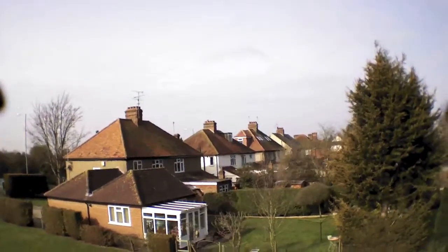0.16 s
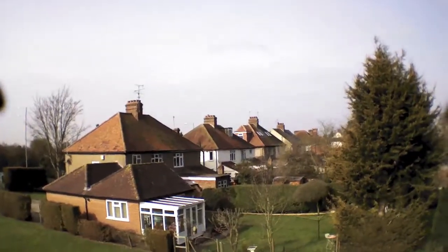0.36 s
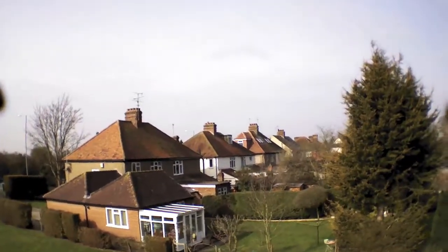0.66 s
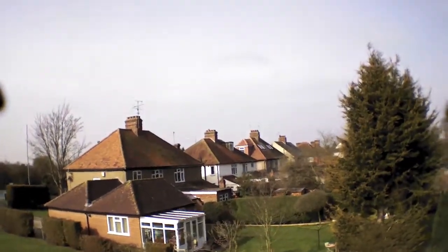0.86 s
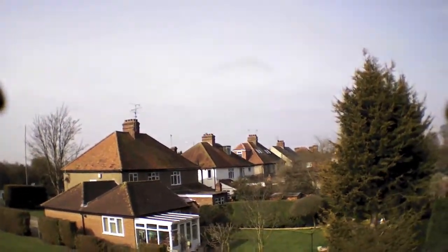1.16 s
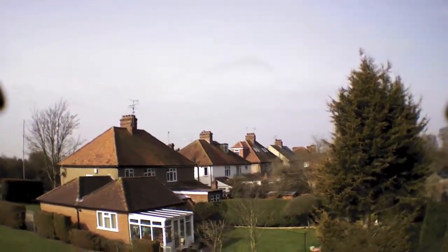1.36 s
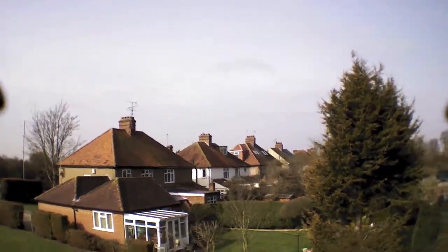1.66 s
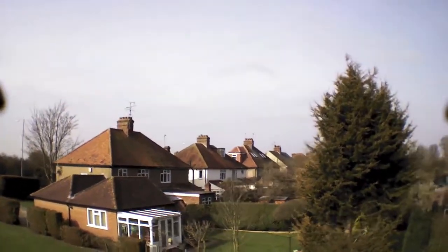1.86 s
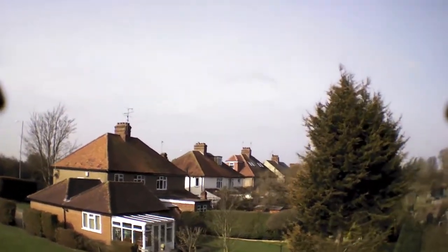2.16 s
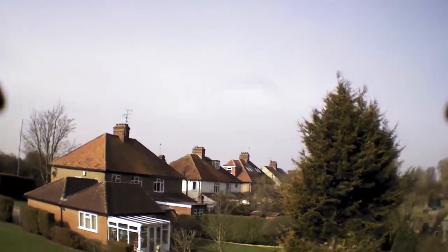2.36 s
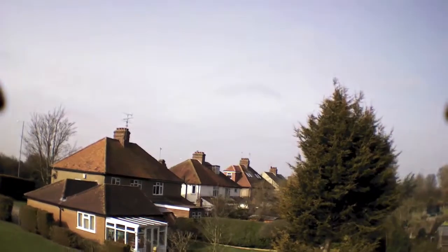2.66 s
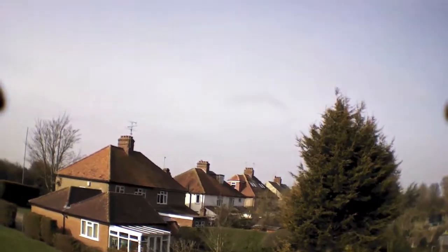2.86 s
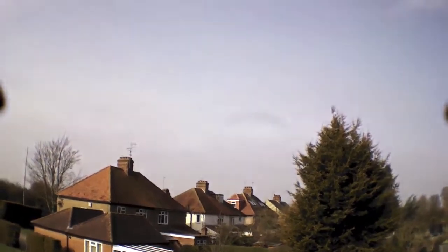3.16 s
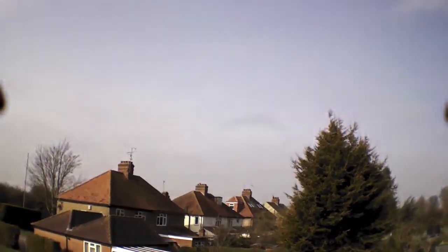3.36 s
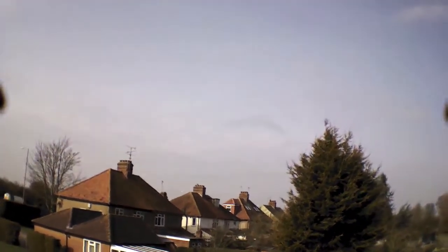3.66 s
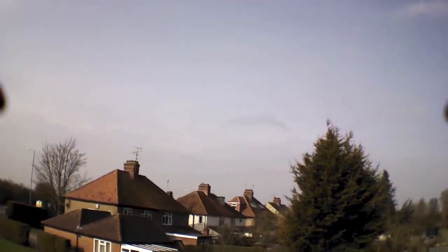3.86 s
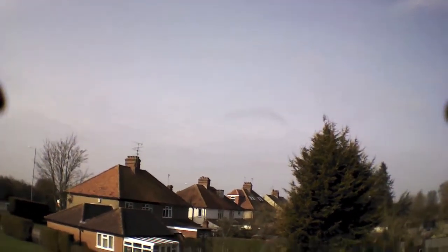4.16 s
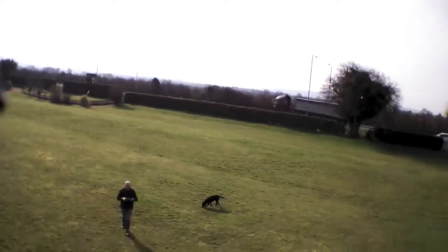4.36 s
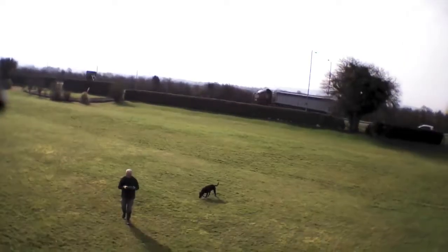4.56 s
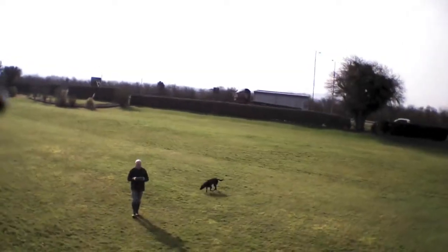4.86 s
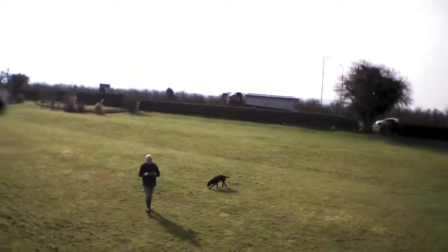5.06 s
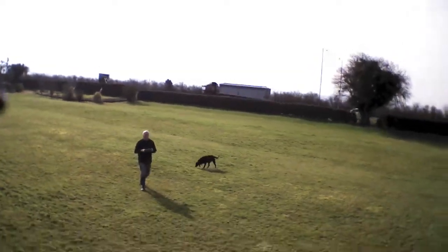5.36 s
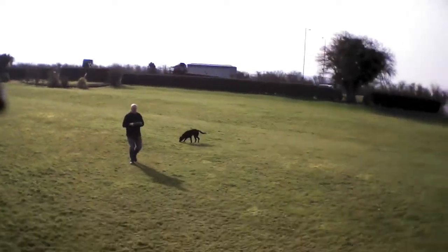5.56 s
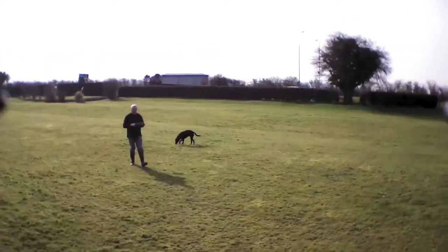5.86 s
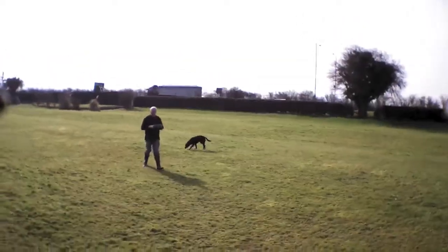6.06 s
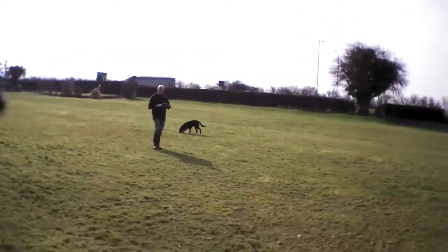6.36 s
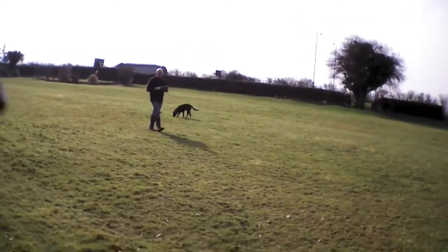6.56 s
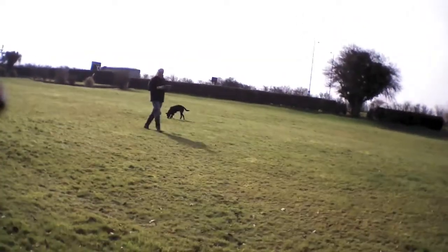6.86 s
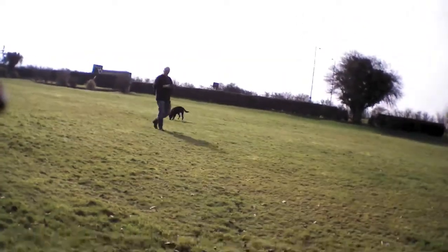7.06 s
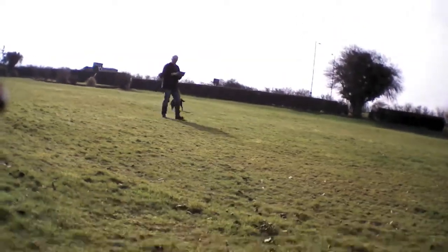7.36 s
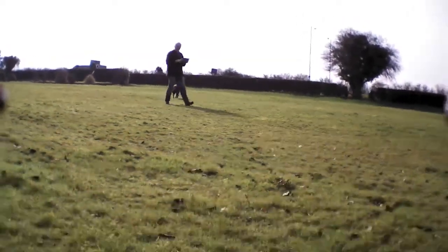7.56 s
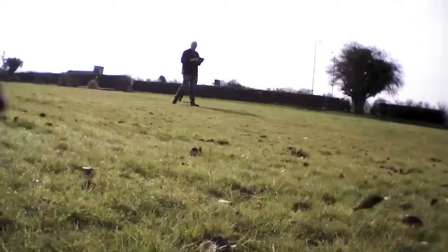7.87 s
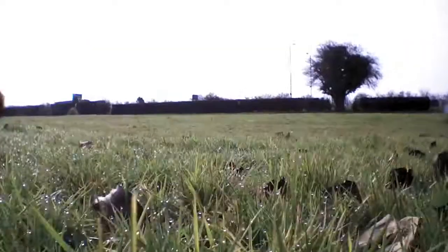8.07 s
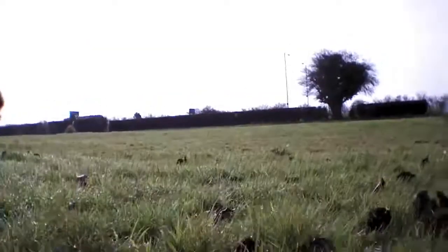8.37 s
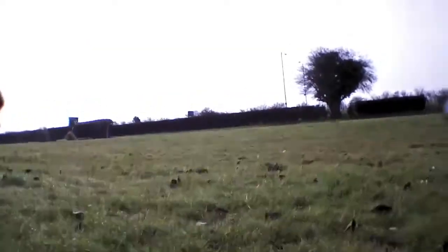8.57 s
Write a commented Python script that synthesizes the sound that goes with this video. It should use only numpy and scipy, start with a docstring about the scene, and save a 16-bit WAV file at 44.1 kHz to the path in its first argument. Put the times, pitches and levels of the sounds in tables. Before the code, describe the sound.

A small drone flies outdoors with a thin, wavering whine and a steady propeller hiss, over low wind and distant traffic. At first, cloth or grass swishes, plastic clicks near the microphone and a bird whistles high. After a brief dip, the hiss and wind are stronger and birds chirp. More swishes follow, then another dip, and the motors spool up close by as gusts buffet the microphone.

```python
"""Quadcopter over a grassy field

In three passages joined by short fades, a small quadcopter whines and hisses overhead and at last spools
up close by. Its motors give wavering tones, its rotors a hiss modulated by the passing blades. Wind, far
traffic and birds lie behind, while grass and cloth swish and plastic clicks near the microphone."""
import sys
import numpy as np
from scipy import signal
from scipy.io import wavfile
from scipy.ndimage import uniform_filter1d

SR = 44100
rng = np.random.default_rng(int(sys.argv[2]) if len(sys.argv) > 2 else 0)


def store_pcm(level_fs):
    """Save levels as 16-bit WAV."""
    pcm = np.round(np.clip(level_fs, -1, 1) * 32767).astype(np.int16)
    wavfile.write(sys.argv[1], SR, np.atleast_2d(pcm).T)


N = 384993
T = np.arange(N) / SR

# dips between the passages: (time [s], fade-out [s], fade-in [s])
FADES = [(4.261, 0.1, 0.095), (8.096, 0.086, 0.11)]
# slow levels, one list a passage: (time [s], wind [dB], traffic [dB], rotor hiss [dB], breeze [dB])
BED_LEVELS = [
    [(0, -54, -45.5, -42.5, -60), (.4, -50.5, -44.5, -44, -58), (.8, -48, -44.5, -40.5, -60),
     (1.1, -51.5, -45.5, -45, -47), (2.55, -56, -43.5, -42.5, -50), (2.8, -60, -46.5, -45.5, -51.5),
     (3.5, -58, -42.5, -45.5, -47), (4.12, -56, -40.5, -42, -49.5)],
    [(4.4, -38.5, -39, -36.5, -47), (5.46, -39, -40, -37.5, -49.5), (6.45, -38, -40.5, -37.5, -46.5),
     (6.85, -38, -39, -41.5, -46.5), (7.25, -38.5, -37, -44, -53), (7.55, -40, -38, -47.5, -49),
     (7.95, -40.5, -38.5, -52, -46.5)],
    [(8.2, -41, -38, -31.5, -46), (8.45, -36.5, -34.5, -28.5, -42.5), (8.73, -41.5, -31, -23.5, -37)],
]


def gain_of(db):
    """Amplitude ratio of a level in decibels."""
    return 10 ** (np.asarray(db) / 20)


def unit_rms(x):
    """Normalisation to rms 1."""
    return x / np.sqrt(np.mean(x ** 2) + 1e-20)


def superpose(events):
    """Linear superposition of (start [s], sound) pairs."""
    mix = np.zeros(N)
    for start, sound in events:
        part = mix[round(start * SR):][:len(sound)]
        part += sound[:len(part)]
    return mix


def unroll(rows):
    """Linear interpolation of breakpoints: the start time and each column, sample by sample."""
    times, *columns = np.transpose(rows)
    t = np.arange(times[0], times[-1], 1 / SR)
    return times[0], [np.interp(t, times, c) for c in columns]


def bed_levels(t):
    """Wind, traffic, hiss and breeze levels [dB], interpolated within each passage."""
    passage = np.searchsorted([fade[0] for fade in FADES], t)
    curves = [[np.interp(t, times, c) for c in columns] for times, *columns in map(np.transpose, BED_LEVELS)]
    return np.choose(passage, np.array(curves))


def drift(n, span_s):
    """Low-pass random fluctuation of rms 1, correlated over about span_s."""
    size = max(int(span_s * SR), 2)
    return unit_rms(uniform_filter1d(uniform_filter1d(rng.standard_normal(n), size), size))


def noise(spectrum, patchy_db, size=1024, n=N):
    """Spectrally shaped noise of rms 1 whose level varies in patches over time and frequency."""
    frames, hz = n * 4 // size + 5, np.fft.rfftfreq(size, 1 / SR)
    real, imag, patches = rng.standard_normal((frames, len(hz), 3)).T
    patches = uniform_filter1d(patches, size=size // 64, axis=0)
    patches = unit_rms(uniform_filter1d(patches, size=12, axis=1))
    knots_hz, db = np.transpose(spectrum)
    colour = np.interp(np.log(hz + 1), np.log(knots_hz + 1), db, -90, -90)
    bins = (real + 1j * imag) * gain_of(colour[:, None] + patchy_db * patches)
    return unit_rms(signal.istft(bins, nperseg=size, noverlap=size * 3 // 4)[1][:n])


def passage_noise(spectra, patchy_db, size=1024):
    """Piecewise shaped noise, with one spectrum for each passage."""
    lengths = np.diff([0] + [round(fade[0] * SR) for fade in FADES] + [N])
    return np.concatenate([noise(spectrum, patchy_db, size, n) for spectrum, n in zip(spectra, lengths)])


def narrowband(hz, width_hz):
    """Noise of rms 1 through two cascaded resonators that follow the curve hz."""
    carrier = np.exp(2j * np.pi * np.cumsum(hz) / SR)
    pole = np.exp(-np.pi * width_hz / SR)
    baseband = rng.standard_normal(len(hz)) * carrier.conj()
    envelope = signal.lfilter([1], [1, -2 * pole, pole * pole], baseband)
    return unit_rms((carrier * envelope).real)


def rotor_band(rows, width_hz):
    """Line broadening: rotors at slightly different speeds merge into one fuzzy tone."""
    start, (hz, db) = unroll(rows)
    return start, gain_of(db) * narrowband(hz, width_hz)


def wind():
    """Turbulent pressure on the microphone: a lumpy rumble, to which gusts add a deeper buffet."""
    # spectra of rumble and buffet: (frequency [Hz], relative density [dB])
    rumble_spectrum = [(18, -60), (30, -25), (75, -25), (115, -7), (184, 1.5), (284, -5), (409, -20),
                       (500, -18), (650, -55), (1100, -120)]
    buffet_spectrum = [(40, -40), (70, -15), (110, 0), (150, -1), (220, -40)]
    # gusts: (peak time [s], rise of the rumble [dB], half length [s])
    gusts = [(.63, 4.5, 0.18), (1.79, 6, 0.083), (8.248, 16.5, .05), (8.357, 14, 0.03), (8.409, 14, 0.032),
             (8.564, 7.5, 0.11)]
    rumble = noise(rumble_spectrum, patchy_db=1.33, size=2048) * gain_of(0.62 * drift(N, 0.023))
    buffet = gain_of(-6) * noise(buffet_spectrum, patchy_db=1.5, size=2048)
    surge = gain_of(sum(db * np.clip(1 - abs(T - peak) / half_s, 0, 1) for peak, db, half_s in gusts))
    return surge * rumble + (surge - 1) * buffet


def breeze():
    """Incoherent rustling of leaves and grass sums to broadband noise."""
    # rustle: (frequency [Hz], relative density [dB])
    spectrum = [(900, -37), (1500, -8.5), (2500, -1.5), (5500, -4.5), (8000, -18), (10000, -40)]
    return noise(spectrum, patchy_db=0.96, size=512)


def traffic():
    """Far vehicles sum incoherently to a wash of noise with little treble."""
    # one spectrum a passage: (frequency [Hz], relative density [dB])
    spectra = [
        [(24, -63), (40, -33), (75, -7), (139, -16.5), (234, -2), (254, -1), (272, -18), (309, -33), (365, -4),
         (466, -8.5), (615, -1), (702, -7), (840, -1), (2000, -15.5), (2600, -33), (4400, -120)],
        [(180, -11), (300, -6), (409, -9.5), (507, -12), (548, -6.5), (822, -5.5), (1090, -2.5), (2000, -12.5),
         (2600, -22), (4400, -120)],
        [(180, -31), (300, -9), (409, -6), (472, -1), (608, -7), (911, -3), (2000, -12.5), (2600, -29),
         (4400, -120)],
    ]
    return passage_noise(spectra, patchy_db=1.13)


def hiss_ridges():
    """Gaussian spectral peaks whose centres drift and whose level follows the rotor hiss."""
    # peaks: (width [Hz], curve of (time [s], centre [Hz], relative level [dB]))
    ridges = [ (850, [(0, 12000, -7), (1.3, 12600, -10), (3, 11300, -12), (3.6, 12500, -8),
              (4.25, 12100, -8)]), (700, [(0, 10100, -10), (1.3, 10600, -7), (2.2, 10400, -12),
              (3, 9700, -12), (3.5, 10600, -12), (4.25, 10400, -18)]), (800, [(1.3, 9300, -12),
              (1.9, 9000, -3), (2.3, 9400, -12)]), (1000, [(0, 15300, 0), (.6, 15000, -18),
              (1.5, 14100, -8), (4.25, 14500, -19)]), (1200, [(4.27, 12200, 4), (4.9, 12600, -3),
              (5.3, 12300, -1), (5.75, 12700, -6), (6.25, 12300, -2.5), (6.6, 12750, -18),
              (7.2, 12850, -10), (8.09, 12800, 6.5)]), (1050, [(4.27, 9800, 0.5), (5.2, 9900, -10),
              (5.7, 10050, -2), (7, 9900, -2), (7.6, 9900, -14)]), (900, [(4.27, 14900, -11),
              (5.3, 15600, -15), (5.9, 15300, -30)]), (650, [(8.1, 10800, -10), (8.22, 11200, -7),
              (8.32, 12350, 2), (8.55, 12300, -2), (8.62, 13500, -2), (8.73, 14000, -3)]),
              (950, [(8.1, 14700, 4), (8.3, 15300, 3), (8.73, 15400, -4)]), (950, [(8.1, 7040, -4),
              (8.25, 7400, 0), (8.73, 8800, -8.5)]), ]
    size = 256
    t = np.arange(N * 4 // size + 5) * size / 4 / SR
    hz = np.fft.rfftfreq(size, 1 / SR)[:, None]
    power, hiss_db = np.zeros((len(hz), len(t))), bed_levels(t)[2]
    for width_hz, rows in ridges:
        times, *columns = np.transpose(rows)
        on = (t >= times[0]) & (t < times[-1])
        centre, db = (np.interp(t[on], times, c) for c in columns)
        bell = np.exp(-4 * ((hz - centre) / width_hz) ** 2)
        power[:, on] += gain_of(hiss_db[on] + db) ** 2 / width_hz * bell
    real, imag = rng.standard_normal((len(t), len(hz), 2)).T
    bins = (real + 1j * imag) * np.sqrt(power)
    return 12.3 * signal.istft(bins, nperseg=size, noverlap=size * 3 // 4)[1][:N]


def rotor_hiss(gain):
    """Broadband rotor noise, amplitude-modulated at the blade-passing rate and at half that rate."""
    # one spectrum a passage: (frequency [Hz], relative density [dB])
    spectra = [
        [(2200, -12), (3000, -6.5), (3600, 0), (4300, -1), (4900, -4.5), (7000, -9.5), (8200, -10),
         (11000, -10.5), (13400, -14.5), (15300, -13), (15900, -17)],
        [(2200, -40), (3000, -16), (3500, -4), (4250, -7.5), (4800, -5), (5500, -5), (7400, -11.5), (8500, -2),
         (11200, -4.5), (14000, -8.5), (15900, -9.5)],
        [(1500, -36), (2600, -10), (4340, -7), (6300, -9), (8130, -5), (10500, -10.5), (12300, -5.5),
         (15900, -8)],
    ]
    blade_hz = 124 * (1 + 0.0207 * drift(N, 0.28))
    phase = 2 * np.pi * np.cumsum(blade_hz) / SR
    flutter = 1 + 0.077 * np.cos(phase) + 0.043 * np.cos(phase / 2)
    flutter *= gain_of(0.7 * drift(N, 0.0025))
    return flutter * (hiss_ridges() + gain * passage_noise(spectra, patchy_db=1.16, size=512))


def motor_whines():
    """Commutation tones: each spectral line weaves and swells inside a halo of noise."""
    # four motors in each of the first two passages: (time [s], pitch [Hz], level [dB])
    motors = [
        [(0, 4250, -48), (.45, 4400, -51), (.8, 4140, -48), (1.22, 4230, -48), (1.42, 4170, -49),
         (1.62, 4230, -47), (1.85, 4320, -53), (2.2, 4250, -49), (2.45, 4220, -48), (2.9, 4250, -62),
         (3.03, 4300, -52), (3.14, 4180, -47), (3.33, 4420, -44), (3.55, 4180, -50), (3.7, 4370, -49),
         (4.25, 4250, -56)],
        [(0, 3850, -50), (.5, 3900, -64), (1.2, 3790, -54), (1.38, 4020, -50), (1.5, 4010, -51),
         (1.65, 4060, -48), (1.9, 3950, -50), (2.05, 4050, -49), (2.2, 4200, -51), (2.6, 4050, -54),
         (3.1, 3870, -58), (3.3, 4050, -54), (4.04, 3980, -52), (4.1, 4120, -50), (4.25, 4000, -50)],
        [(.76, 3690, -42), (1, 3530, -54), (1.27, 3570, -44), (1.4, 3570, -47), (1.5, 3480, -42),
         (1.63, 3530, -43), (1.7, 3620, -46), (1.8, 3520, -47), (2, 3500, -42), (2.15, 3660, -47),
         (2.3, 3830, -51), (2.47, 3900, -48), (2.56, 3800, -56), (2.65, 3780, -44), (2.75, 3960, -44),
         (2.87, 4130, -49), (2.96, 4050, -48), (3.03, 4280, -52)],
        [(2.15, 3530, -48), (2.3, 3670, -47), (2.5, 3750, -50), (2.62, 3800, -54), (2.75, 3500, -52),
         (3, 3550, -50), (3.12, 3650, -49), (3.3, 3750, -64), (3.85, 3510, -50.5), (4.25, 3640, -54)],
        [(4.3, 4040, -49), (4.62, 4260, -47), (4.85, 4140, -48), (5.05, 4080, -45), (5.15, 4230, -46),
         (5.33, 4090, -47), (5.52, 4200, -45), (5.78, 4290, -44), (5.95, 4120, -47), (6.2, 4130, -45),
         (6.4, 4180, -55), (7.6, 4100, -60), (7.8, 4100, -48), (7.9, 4020, -47), (8.09, 4060, -49)],
        [(4.3, 4350, -64), (4.85, 4270, -49), (5.05, 4370, -47), (5.75, 4430, -47), (6.1, 4250, -49),
         (6.42, 4450, -44), (6.58, 4280, -43), (6.7, 4440, -43.5), (7, 4270, -61), (7.7, 4300, -56),
         (7.88, 4330, -50), (8.09, 4370, -52)],
        [(4.3, 3510, -65), (4.8, 3490, -52), (5.4, 3480, -57), (6.3, 3570, -58), (6.6, 3500, -50),
         (7, 3500, -62)],
        [(5.1, 3880, -66), (5.8, 3800, -53), (6.1, 3800, -54), (7, 3970, -48), (7.15, 3940, -67),
         (7.85, 4030, -59), (7.95, 3900, -54), (8.09, 4080, -53)],
    ]
    for rows in motors:
        start, (hz, db) = unroll(rows)
        n = len(hz)
        hz = hz * (1 + .005 * drift(n, .025) + .0033 * drift(n, .006))
        line = np.sqrt(2) * np.sin(2 * np.pi * np.cumsum(hz) / SR) * gain_of(1.8 * drift(n, 0.02))
        halo = narrowband(hz, width_hz=280)
        yield start, gain_of(db) * (.85 * line + .7 * halo) * signal.windows.tukey(n, .05)


def swishes():
    """Friction noise of grass and cloth: many tiny slips under each stroke."""
    # strokes: (start [s], peak [s], end [s], peak level of the middle band [dB],
    # then relative to that band: bass [dB], upper middle [dB], treble [dB])
    strokes = [(.02, 0.164, .2, -37, -6.5, -2.5, -9), (0.227, 0.323, .35, -34.5, -8.5, -4.5, -6.5),
               (0.437, 0.48, .51, -32, -2.5, -2.5, -4), (0.529, 0.588, .64, -23.5, -3.5, -0.5, -5.5),
               (0.618, 0.647, .69, -42, -10, 2, -1), (0.653, 0.725, .77, -28.5, -0.5, 1, -2),
               (.92, 0.999, 1.05, -36.5, 5, -1.5, -3), (6.829, 6.994, 7.02, -37.5, 1, -0.5, 2),
               (7.068, 7.118, 7.19, -31, -0.5, 2, 4), (7.188, 7.22, 7.27, -45, -6, -3, -12),
               (7.321, 7.435, 7.5, -25.5, -13, -4.5, -27), (7.594, 7.647, 7.69, -27.5, -9, -6, -24),
               (7.727, 7.765, 7.8, -39, -4, -12, -18), (7.829, 7.862, 7.89, -42, -6, -5, -18),
               (7.921, 7.957, 7.98, -43, -8, -9, -18)]
    # bass, middle, upper middle and treble bands: (lower edge [Hz], upper edge [Hz])
    bands = [(200, 900), (900, 3300), (3300, 8000), (8000, 13000)]
    filters = [signal.butter(3, edges, "bandpass", fs=SR, output="sos") for edges in bands]
    for start, peak, end, peak_db, bass_db, upper_db, treble_db in strokes:
        pressed, eased = start + 0.02, peak + 0.36 * (end - peak)
        _, (db,) = unroll([(start, -23), (pressed, -6.5), (peak, 0), (eased, -3), (end, -22)])
        n = len(db)
        slips = rng.standard_normal(n) * gain_of(1.1 * drift(n, 0.00019))
        bass, middle, upper, treble = (unit_rms(signal.sosfilt(sos, slips)) for sos in filters)
        rub = middle + gain_of(bass_db) * bass + gain_of(upper_db) * upper + gain_of(treble_db) * treble
        yield start, gain_of(peak_db + db) * rub * signal.windows.tukey(n, .15)


def chirp_curve(start, rise_s, fall_s, peak_db, start_hz, peak_hz, end_hz, blur):
    """Amplitude and frequency modulation of a short note: it swells and fades as its pitch slides."""
    peak = start + rise_s
    return [(start, peak_db - 7, start_hz, blur), (peak, peak_db, peak_hz, blur),
            (peak + fall_s, peak_db - 13, end_hz, blur)]


def bird_calls():
    """Nearly pure tones, which distance and scattering by leaves blur into narrow bands."""
    # two long whistles of the high bird: (time [s], level [dB], pitch [Hz], noise share of power [0-1])
    whistles = [
        [(1.25, -28, 7150, .3), (1.258, -31.5, 8340, 0.4), (1.3, -29, 8860, .05), (1.322, -32, 8620, .05),
         (1.335, -27, 8420, .05), (1.378, -31, 8600, .2), (1.388, -31, 6600, .4)],
        [(1.452, -13, 8050, .1), (1.468, -28.5, 8590, .1), (1.505, -22.5, 8400, .03), (1.544, -30, 8250, 0.2),
         (1.575, -23, 7970, 0), (1.62, -31, 7830, 0), (1.66, -42, 7600, .05), (1.72, -39, 7530, .1)],
    ]
    # short notes: (start [s], rise [s], fall [s], peak level [dB], pitch at start, peak and end [Hz])
    high_notes = [(.345, .018, .01, -44, 8050, 8250, 8100), (.372, 0.04, .022, -41, 8700, 8580, 8550),
                  (.368, 0.011, .018, -48, 7400, 7500, 7250), (.43, 0.014, .02, -45, 7350, 7550, 7650),
                  (.488, 0.02, .014, -41, 7700, 7600, 7260), (.528, .008, .008, -44, 7400, 7500, 7500),
                  (1.124, .004, .006, -37, 7460, 8350, 9600), (1.143, .004, .005, -44, 7800, 8500, 9400),
                  (2.208, .006, .008, -34.5, 5860, 6680, 8050), (2.26, .005, .007, -44, 6100, 6350, 6600),
                  (5.946, 0.042, 0.064, -33.5, 7460, 8070, 8200),
                  (6.232, 0.044, 0.054, -30.5, 7800, 8270, 8150)]
    low_notes = [(.855, .013, .017, -31, 3576, 3545, 3220), (.95, .012, .012, -40, 2800, 2750, 2650),
                 (2.475, .022, .018, -38, 3990, 4550, 5050), (2.518, .035, .045, -40, 3600, 4150, 4350),
                 (2.59, .025, .025, -40, 3800, 4000, 4080), (5.37, .03, .012, -30.5, 4230, 4030, 4000),
                 (5.4, .015, .015, -36, 3700, 3600, 3450), (5.463, .027, .02, -28.5, 4130, 3960, 3400),
                 (5.463, .009, .01, -41, 5150, 5080, 5000), (5.535, .01, .008, -42, 5120, 5070, 5000),
                 (5.54, .013, .042, -31, 4150, 4000, 3480), (5.63, .013, .047, -39, 4090, 3970, 3620),
                 (6.388, .014, .034, -27, 4200, 4140, 3700), (6.427, .009, .009, -31, 3924, 4900, 5800),
                 (6.438, .012, .03, -31, 4000, 4400, 4400), (6.495, .022, .028, -34, 4040, 3950, 3500),
                 (6.59, .015, .015, -41, 4150, 4030, 4020), (6.645, .015, .02, -36, 4140, 4050, 3950),
                 (6.688, .012, .014, -37, 3800, 3720, 3650), (6.718, .018, .012, -37, 3700, 3850, 3950),
                 (6.755, .03, .025, -37, 3800, 3680, 3880)]
    high = [chirp_curve(*row, blur=.35) for row in high_notes]
    low = [chirp_curve(*row, blur=.42) for row in low_notes]
    for rows in whistles + high + low:
        start, (db, hz, blur) = unroll(rows)
        pure = np.sqrt(2) * np.sin(2 * np.pi * np.cumsum(hz) / SR)
        call = np.sqrt(1 - blur) * pure + np.sqrt(blur) * narrowband(hz, width_hz=320)
        yield start, gain_of(db) * call * signal.windows.tukey(len(hz), .2)


def scatter(sound, t60_s=0.35):
    """Diffuse reflection from hedges and walls: convolution with exponentially decaying noise."""
    t = np.arange(6000) / SR
    echoes = rng.standard_normal(len(t)) * gain_of(-60 * t / t60_s)
    return signal.oaconvolve(sound, echoes / np.linalg.norm(echoes))[:N]


def shell_clicks():
    """Impacts excite four damped modes of a plastic shell: knock, thump, crack and tick."""
    # impacts: (time [s], knock [dB], thump [dB], tick [dB], tick pitch [Hz], crack [dB]);
    # thump, tick and crack levels are relative to the knock
    impacts = [(0.8328, 3, -15, 2, 9800, -13), (0.931, -14.5, -9, -4.5, 10500, -16),
               (1.0994, -1.5, -19, -0.5, 8200, -12), (1.3995, 3.5, -45, -1, 6940, -18),
               (1.4612, -12, -22, -20, 5000, -20), (1.6947, -4, -25, -5, 7700, -11),
               (1.8223, -1.1, -39, 2, 4540, -13), (1.8716, -4.5, -27, -13.5, 5000, -13),
               (1.9293, -2.5, -38, -1, 5300, -12), (2.7261, 11.5, -47, -2.5, 7900, -15.5),
               (4.3628, -10, -23, 3, 10300, -26), (7.4533, -2.5, -11, -10.5, 4930, -19),
               (8.0452, -18, 2, 0, 4560, -16)]
    t = np.arange(3000) / SR
    rise = (1 - np.exp(-t / 0.000079)) ** 2  # the contact builds over a few tenths of a millisecond
    radiation = signal.butter(4, 190, "highpass", fs=SR, output="sos")  # a small shell gives no deep bass

    def mode(hz, t60_s):
        return np.sin(2 * np.pi * hz * t) * gain_of(-60 * t / t60_s) * rise

    knock, thump, crack = mode(1010, 0.0016), mode(317, 0.011), mode(3530, 0.0031)
    for start, knock_db, thump_db, tick_db, tick_hz, crack_db in impacts:
        tick = mode(tick_hz, 0.001)
        ring = knock + gain_of(thump_db) * thump + gain_of(crack_db) * crack - gain_of(tick_db) * tick
        yield start, gain_of(knock_db) * signal.sosfilt(radiation, ring)


def blade_hum():
    """Periodic loading of the air by the blades gives a faint low tone."""
    # hum: (time [s], pitch [Hz], level [dB])
    curve = [(2.8, 239, -62), (3.4, 234, -54), (4.25, 237, -53)]
    yield rotor_band(curve, width_hz=16.4)


def whirr():
    """Spectral broadening blurs the whine to a diffuse whirr as each of the first two passages ends."""
    # one curve a whirr: (time [s], pitch [Hz], level [dB])
    curves = [
        [(3.5, 4320, -54), (3.7, 4350, -42.5), (4.25, 4300, -48)],
        [(7, 3980, -59), (7.75, 4100, -46.5), (8.09, 4170, -46)],
    ]
    for rows in curves:
        yield rotor_band(rows, width_hz=660)


def spool_up():
    """Pitch follows rotation rate: the whine climbs as the motors speed up close by."""
    # close whine: (time [s], pitch [Hz], level [dB])
    curve = [(8.1, 3530, -36.5), (8.28, 3490, -42.5), (8.45, 4040, -47), (8.58, 4440, -35),
             (8.73, 4520, -30)]
    yield rotor_band(curve, width_hz=200)


def scene():
    """Superposition of all sources, the same in both channels."""
    wind_gain, traffic_gain, hiss_gain, breeze_gain = gain_of(bed_levels(T))
    mix = wind_gain * wind() + breeze_gain * breeze() + traffic_gain * traffic() + rotor_hiss(hiss_gain)
    for source in (motor_whines, swishes, shell_clicks, blade_hum, whirr, spool_up):
        mix += superpose(source())
    birds = superpose(bird_calls())
    mix += birds + gain_of(-9.5) * scatter(birds)
    return np.array([mix, mix])


def record(dry):
    """Linear fades to near silence between passages, bass roll-off, soft saturation and a band limit."""
    bass_hz, edge_hz, ceiling = 70, 15850, 1.05
    fade = np.ones(N)
    for dip, out_s, in_s in FADES:
        fade *= np.clip(np.maximum((dip - T) / out_s, (T - dip) / in_s), .02, 1)
    thinned = signal.sosfilt(signal.butter(2, bass_hz, "highpass", fs=SR, output="sos"), dry * fade)
    rounded = ceiling * np.tanh(thinned / ceiling)  # the input stage rounds off the loudest click
    lowpass = signal.firwin(1023, edge_hz, window=("kaiser", 9), fs=SR)
    return signal.oaconvolve(rounded, lowpass[None], "same")


dry = scene()
out = record(dry)
store_pcm(out)
```